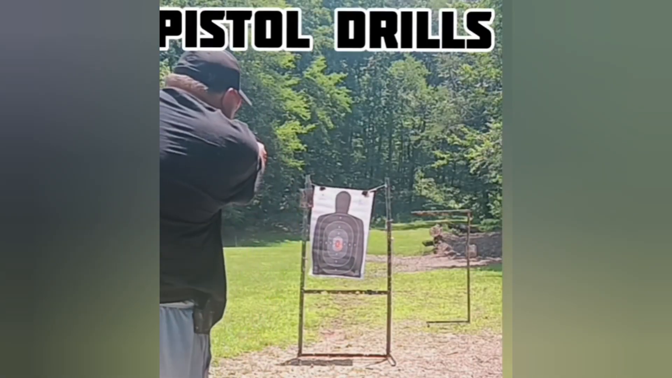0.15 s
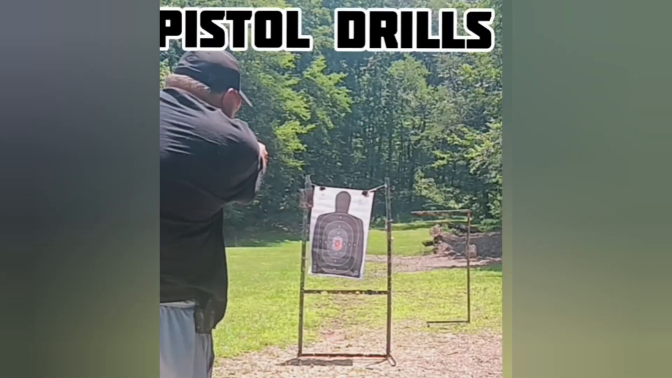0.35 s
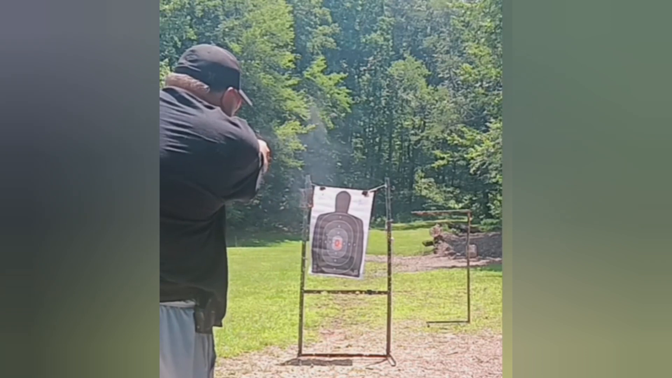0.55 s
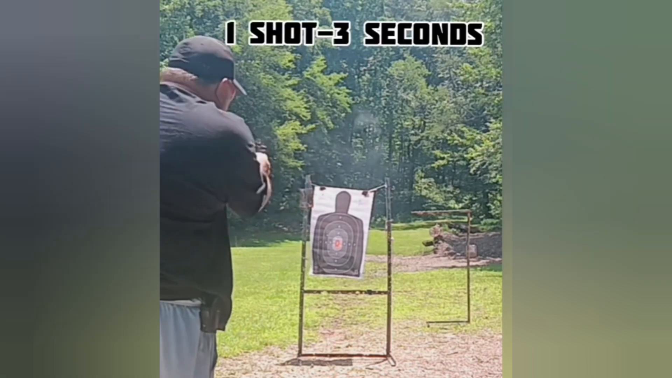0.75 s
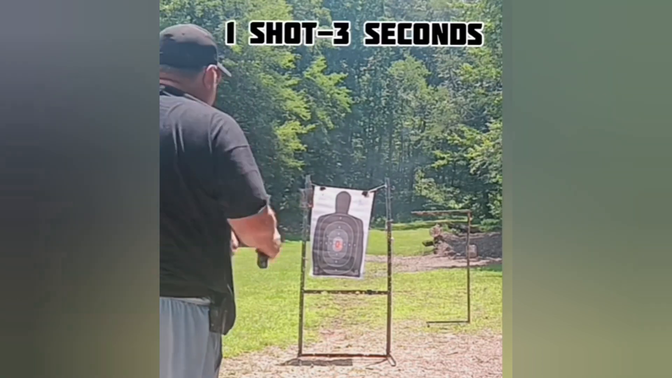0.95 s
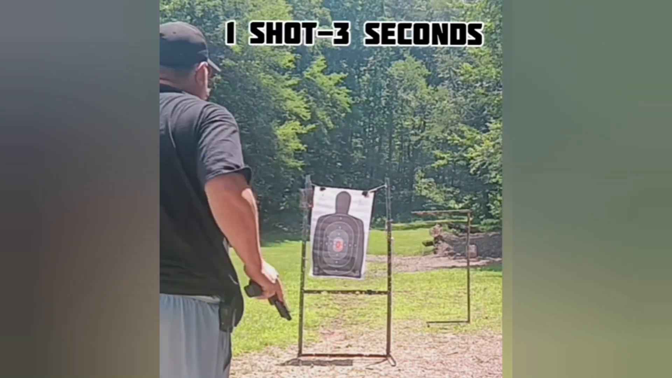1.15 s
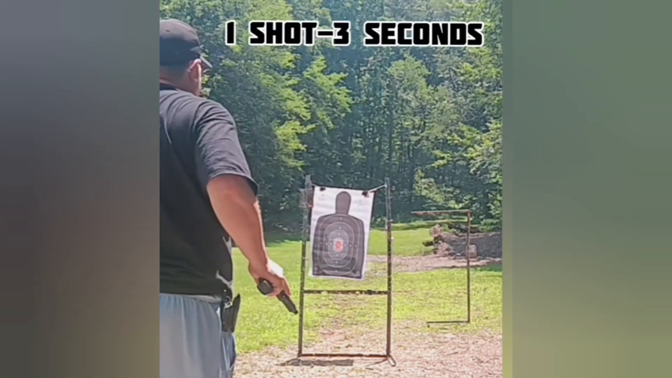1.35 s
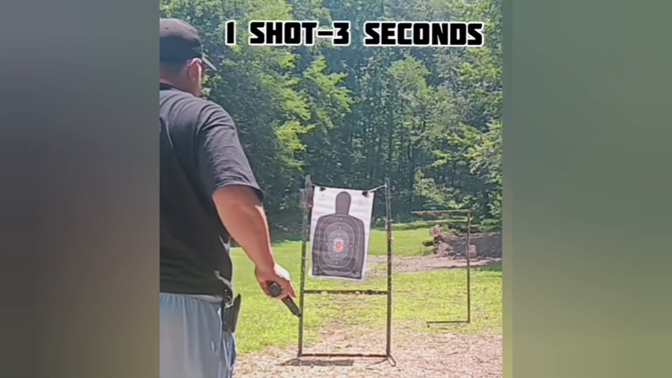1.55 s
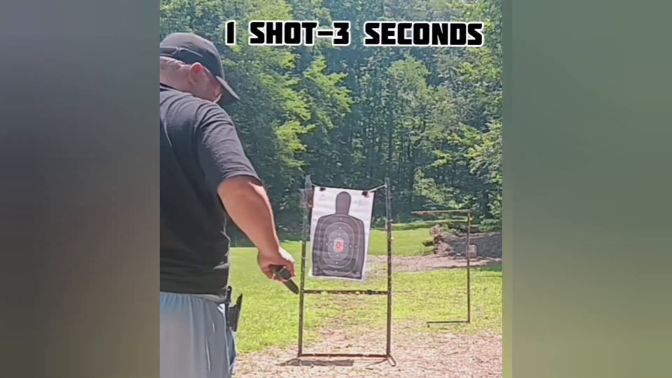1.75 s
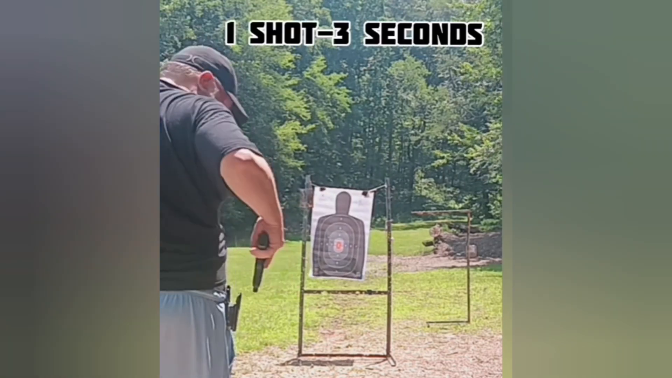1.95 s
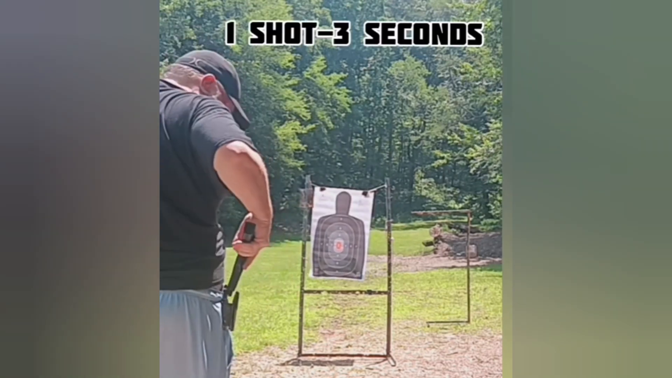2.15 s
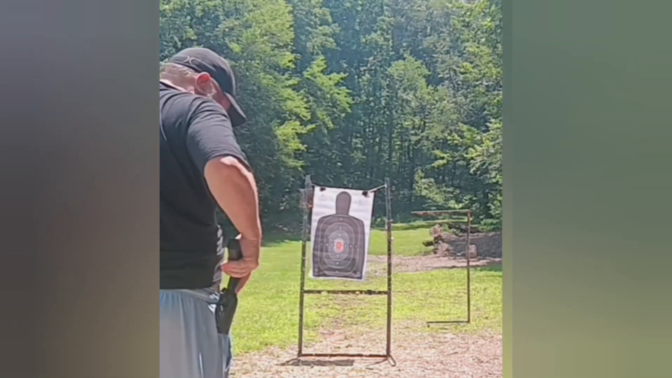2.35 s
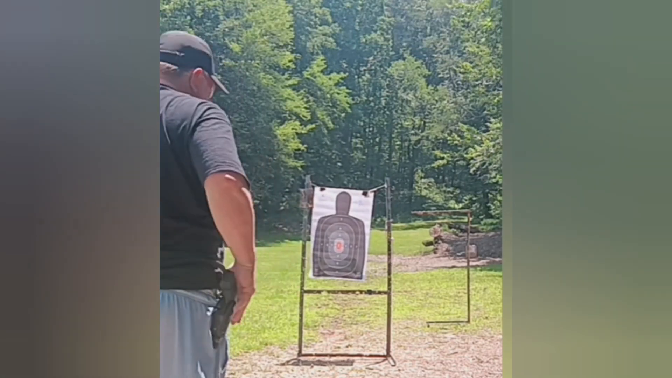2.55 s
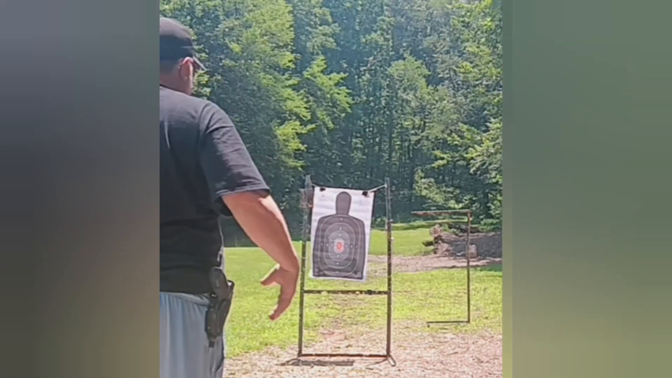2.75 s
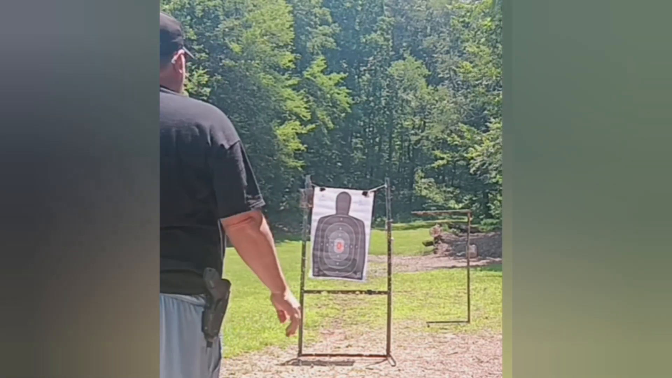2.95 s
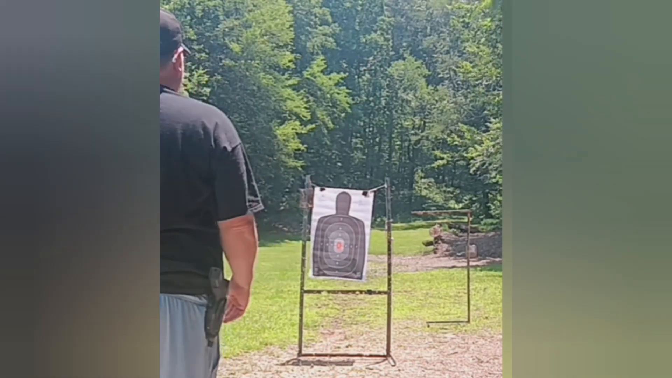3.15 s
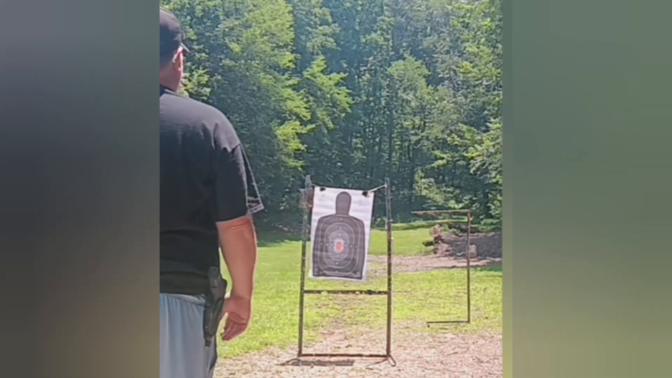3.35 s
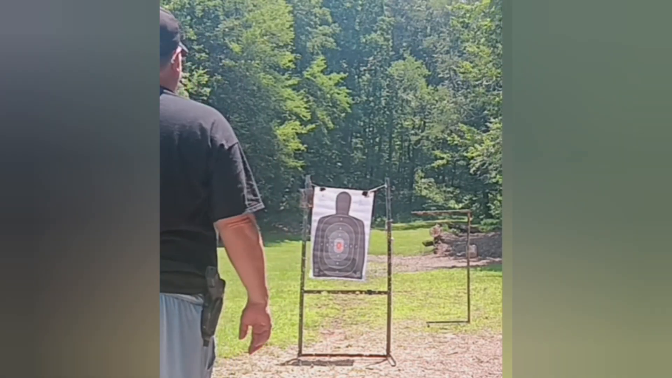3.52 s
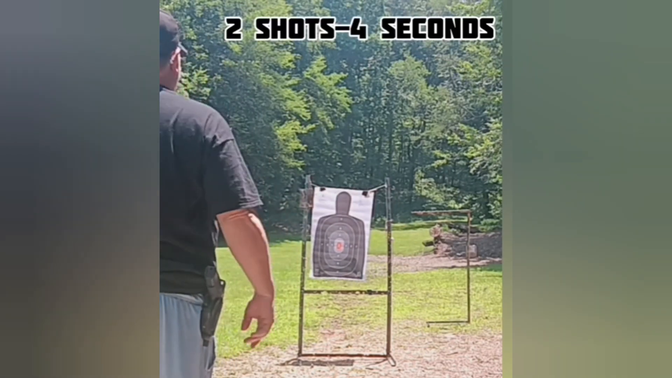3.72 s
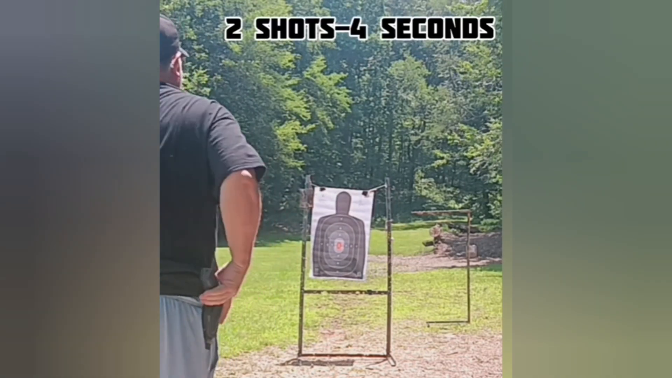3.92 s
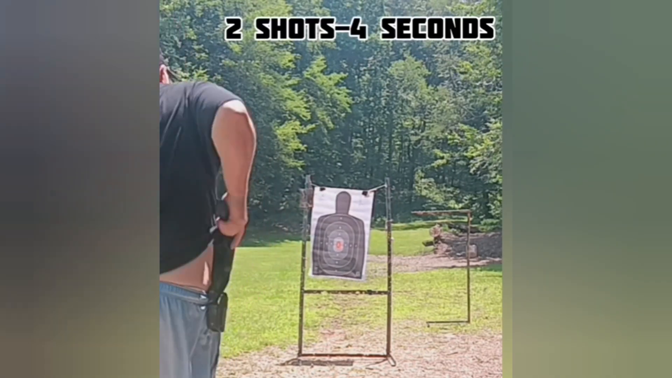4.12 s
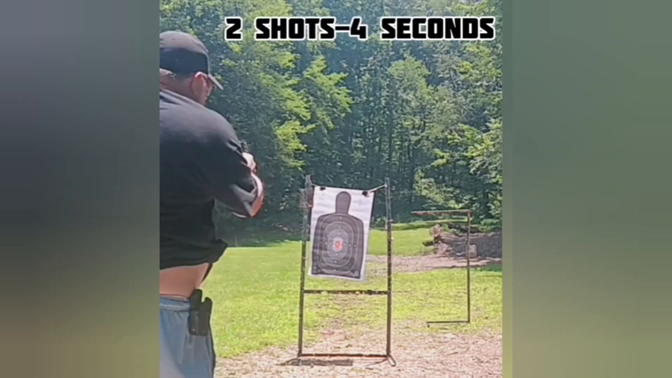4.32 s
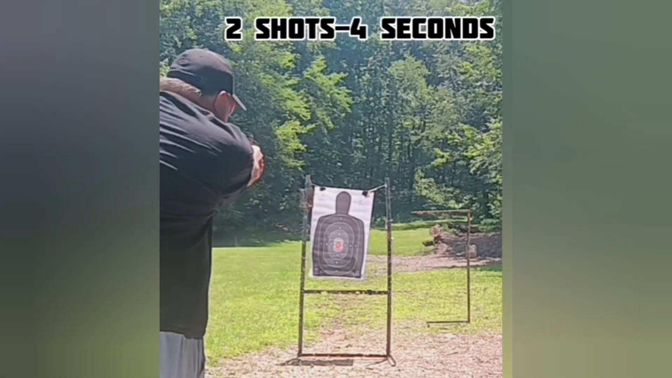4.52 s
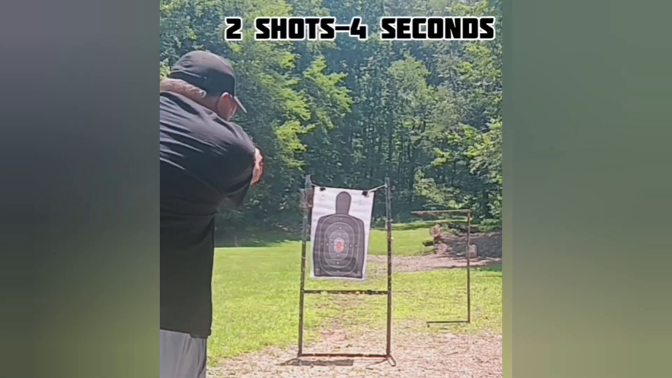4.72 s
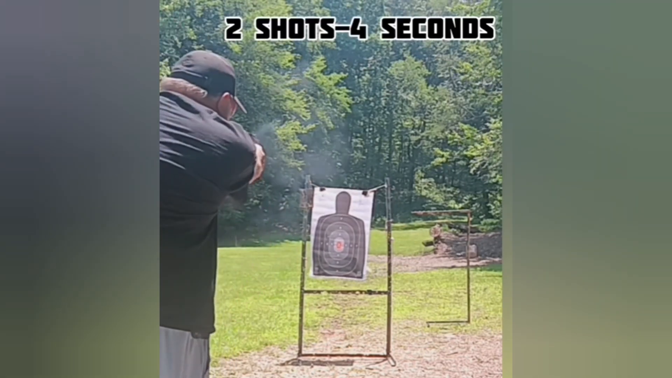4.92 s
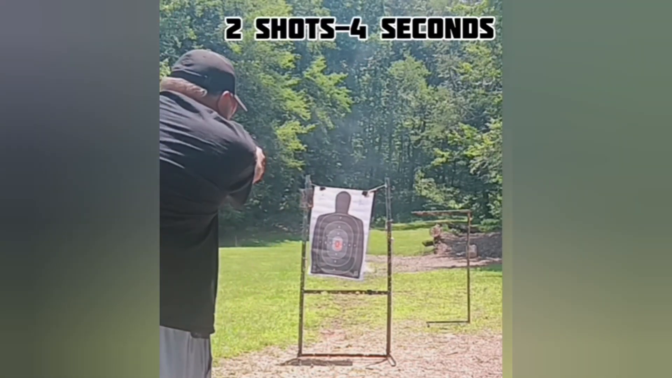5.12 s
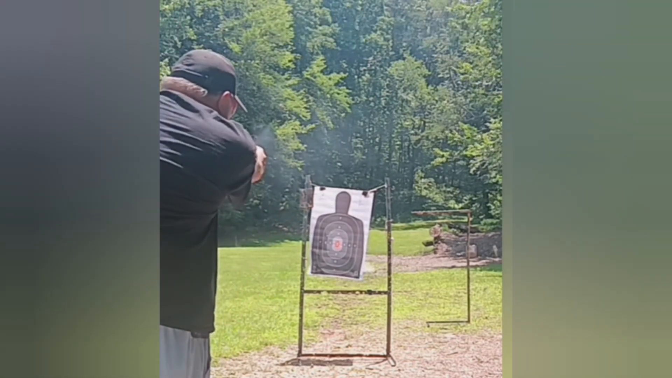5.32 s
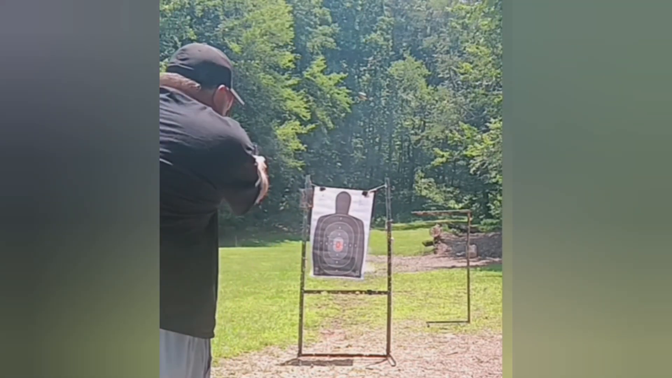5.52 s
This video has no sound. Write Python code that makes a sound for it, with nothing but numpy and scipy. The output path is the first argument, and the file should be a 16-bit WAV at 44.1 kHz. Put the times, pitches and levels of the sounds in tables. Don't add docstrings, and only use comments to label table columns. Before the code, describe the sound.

Outdoor grass range ringed by trees, heard on a phone a couple of metres from the shooter. One harsh clipped pistol blast with a dense rolling echo, a tiny high brass ring, metallic clicks and hard plastic scraping, near quiet with wind bumps on one side, a quick holster draw, then two loud shots whose echoes overlap and continue to the end.

```python
import sys
import numpy as np
from scipy import signal
from scipy.fft import rfft, irfft, next_fast_len
from scipy.io import wavfile
from scipy.ndimage import uniform_filter1d

SR = 44100
rng = np.random.default_rng(int(sys.argv[2]) if len(sys.argv) > 2 else 0)


def wav_record(signal):
    frames = np.transpose(np.atleast_2d(signal))
    bounded = np.clip(frames, -1, 1)
    quanta = np.round(bounded * 32767).astype(np.int16)
    wavfile.write(sys.argv[1], SR, quanta)


def ratio_of_db(decibels):
    return 10 ** (np.asarray(decibels, float) / 20)


N = 250047
T = np.arange(N) / SR
SIZE = next_fast_len(N + 4096)
HZ = np.maximum(np.arange(SIZE // 2 + 1) * SR / SIZE, 1)


def on_log(table, hz):
    f, v = np.transpose(table)
    return np.interp(np.log(hz), np.log(f), v)


def shape(x, gain):
    return irfft(rfft(x, SIZE) * gain, SIZE)[..., :N]


def unit(x):
    return x / np.sqrt(np.mean(x ** 2))


def peak(hz, width_hz):
    return 1 / (1 + 1j * (HZ ** 2 - hz ** 2) / (HZ * width_hz))


def causal(db):
    log = db * np.log(10) / 20
    mirrored = np.concatenate([log, log[..., -2:0:-1]], axis=-1)
    return np.exp(np.conj(signal.hilbert(mirrored))[..., :len(HZ)])


def walk(rate):
    k = int(SR / rate)
    held = np.repeat(rng.standard_normal(N // k + 1), k)
    return 1.2 * uniform_filter1d(held, k)[:N]


def grains(rough_db):
    sizes = np.minimum(rng.exponential(size=N), 5)
    return unit(rng.standard_normal(N) * ratio_of_db(rough_db * sizes))


def fall(s, t60):
    return np.exp(-np.log(1000) * np.clip(T - s, 0, 1) / max(t60, .004)) * (T >= s)


def wavelet(s, hz, db, cycles):
    return ratio_of_db(db) * np.cos(2 * np.pi * hz * (T - s)) * np.exp(-((T - s) * hz / cycles) ** 2)


LAG_S = 0.00102
# frequency in Hz, share common to both ports.
COHERENCE = [(60, 0.91), (250, 0.43), (700, 0.22), (3000, 0.068), (8000, 0.33)]


def ports(make):
    alike = np.clip(on_log(COHERENCE, HZ), 0, 1)
    common = rfft(make(), SIZE) * np.sqrt(alike)
    own = rfft([make(), make()], SIZE) * np.sqrt(1 - alike)
    return own + [common * np.exp(-2j * np.pi * HZ * LAG_S), common]


# time in seconds, level in dB.
BREEZE = [(0, -57.5), (1.0, -51.5), (2.2, -53.5), (2.85, -58.5), (2.95, -64), (3.4, -63), (4.1, -60),
          (4.7, -66.5), (4.8, -52.5)]
# middle in seconds, length in seconds, level in dB, left minus right in dB.
GUSTS = [(0, 0.0034, -35, -29.5), (0.107, 0.012, -37.5, -29.5), (0.189, 0.028, -39, -19.5),
         (0.275, 0.056, -47, -8.5), (1.06, .06, -52, 15), (1.137, 0.046, -37.5, -8), (1.25, 0.16, -48, -12),
         (1.44, 0.089, -48.5, 22), (1.577, 0.049, -34, -26), (2.198, 0.13, -55, -22),
         (2.413, 0.09, -51, 16.5), (2.675, 0.067, -53, -0.5), (2.82, 0.034, -52, -16.5),
         (3.091, .06, -55, -14), (3.324, 0.029, -48.5, -17.5), (3.465, 0.074, -39.5, -23),
         (3.629, 0.032, -40.5, -17.5), (3.704, 0.051, -45.5, -11), (3.825, 0.052, -49, 12.5),
         (4.024, 0.099, -58, -14), (4.073, 0.02, -47.5, -24), (4.167, 0.041, -44, -13),
         (4.217, 0.028, -35.5, -0.5), (4.299, 0.091, -45.5, 0.5), (4.457, 0.02, -52.5, 20.5),
         (4.599, 0.11, -58, 2)]
GUST_EDGE_DB_S = 423
# time in seconds, frequency in Hz, level in dB, width in cycles.
POPS = [(1.6, 73, -24.5, 1.2), (2.484, 69.1, -40.5, 0.75), (3.442, 60.8, -27, 1.1),
        (3.485, 81.2, -33, 2.04), (3.641, 59.6, -30, 0.62), (3.7002, 230, -17, 0.57),
        (3.7012, 640, -42.5, 0.99), (3.7064, 107, -10, 0.27), (3.727, 42.6, -22.5, 0.466),
        (4.183, 80.8, -27, 0.41), (4.2088, 110, -27, 0.65), (4.211, 201, -36, 0.59)]


def wind():
    out = []
    for side in (1, -1):
        power = ratio_of_db(2 * np.interp(T, *np.transpose(BREEZE)))
        for s, length, db, pan_db in GUSTS:
            port_db = db + side * np.clip(pan_db, -30, 30) / 2 - 3 * np.log2(np.cosh(pan_db / 17))
            outside = np.maximum(np.abs(T - s) - length / 2, 0)
            power = power + ratio_of_db(2 * (port_db - GUST_EDGE_DB_S * outside))
        eddies = unit(shape(rng.standard_normal(N), peak(46, 81)))
        puffs = np.sqrt(power) * ratio_of_db(1.7 * walk(20) - 0.5) * eddies
        out.append(shape(puffs, 1 / (1 + (HZ / 125) ** 3.1)))
    pops = sum(wavelet(*pop) for pop in POPS)
    return np.array(out) + [[.06], [1]] * pops


# frequency in Hz, level in dB per Hz.
AIR = [(90, -23), (150, 1), (400, -1), (800, -9.5), (1700, -15), (2800, -12.5), (5000, -14.5), (8000, -27),
       (10000, -26.5), (13000, -27.5), (16000, -27.5)]
AIR_DB = -76


def air():
    hush = irfft(ports(lambda: rng.standard_normal(N)) * ratio_of_db(on_log(AIR, HZ)), SIZE)[:, :N]
    return unit(hush) * ratio_of_db(AIR_DB + 5.5 + 1.1 * walk(8))


# start in seconds, length in seconds, start and end frequency in Hz, level in dB.
BIRDS = [(0, .03, 4450, 4450, -70), (0.054, .04, 4550, 4600, -65), (0.093, 0.064, 4550, 4470, -64),
         (.125, .045, 4300, 4250, -74), (0.033, .03, 2800, 2730, -79), (0.068, 0.081, 2900, 3300, -75),
         (0.08, .04, 3300, 3200, -76), (0.128, .07, 3750, 3680, -72), (0.148, .04, 3300, 3400, -81),
         (1.89, .13, 4400, 4450, -70), (.2, .07, 3650, 3730, -74), (.23, .06, 4500, 4550, -80),
         (1.993, 0.25, 2970, 3400, -70), (4.36, 0.1, 2950, 2960, -78.5), (4.404, 0.028, 2690, 2590, -80),
         (4.526, 0.033, 3250, 3190, -78.5), (4.529, 0.061, 2800, 2630, -71.5),
         (4.566, 0.034, 2520, 2410, -72), (4.583, .056, 2900, 2920, -76.5), (4.596, 0.055, 2300, 2230, -80)]


def birds():
    out, leaves = np.zeros(N), ratio_of_db(2.2 * walk(90))
    for s, length, start_hz, end_hz, db in BIRDS:
        u = np.clip((T - s) / length, 0, 1)
        hz = start_hz + (end_hz - start_hz) * u + 45 * walk(230)
        out += ratio_of_db(db) * np.sin(np.pi * u) * np.sin(2 * np.pi * np.cumsum(hz) / SR)
    return ratio_of_db(8.0) * out * leaves


# start in seconds, blast peak in dB, echo level in dB, boom in dB.
SHOTS = [
    (0.3416, -10, -0.5, 1),
    (4.7386, 0.5, -1.02, 2),
    (5.1671, -3, -0.84, 5),
]
# delay in seconds, frequency in Hz, level in dB, width in cycles.
BERM = (.314, 125, -20.5, 1.2)


def muzzle():
    out = np.zeros((2, N))
    for s, db, *_ in SHOTS:
        for late, loss_db in [(0, -0.5), (.0035, -5.5)]:
            x = (T - s - late - np.array([[LAG_S], [0]])) / 0.0019
            front = ratio_of_db(db + loss_db) * (1 - x) * np.exp(-np.abs(x)) * (x >= 0)
            out += shape(front, 1 / (1 - 130j / HZ))
        ahead = np.minimum(T - s, 0)
        out += ratio_of_db(db - 10.5) * np.exp(ahead / 0.0022) * (ahead < 0) * rng.standard_normal((2, N))
        out += wavelet(s + BERM[0], *BERM[1:])
    return out


def weights(hz):
    presence = np.interp(np.log2(hz), np.log2([700, 2200, 5300]), [0, 1, 0])
    high = max(np.log2(hz / 2200) / np.log2(5300 / 2200), 0) ** 1.05
    low = np.clip(np.log2(500 / hz) / 1.9, 0, 1)
    return presence, high, low


NEAR_DB, NEAR_PRESENCE_DB, NEAR_TREBLE_DB, NEAR_BASS_DB = -11.5, -1, -2.5, -9
HOLD_S, TREBLE_HOLD_S, BASS_HOLD_S = 0.049, .028, 0.098
FALL_DB_S, TREBLE_FALL_DB_S, BASS_FALL_DB_S, TOP_FALL_DB_S = 67, 86, 258, 38
BASS_START_DB, BASS_RISE_S = -14.5, 0.026
NEAR_END_S, NEAR_END_TIME_S, NEAR_END_DB = 0.076, 0.046, -3.5


def near_echo_db(age, hz, boom_db):
    presence, high, low = weights(hz)
    tilt = np.array([1 - min(high, 1) - low, min(high, 1), low])
    hold = tilt @ [HOLD_S, TREBLE_HOLD_S, BASS_HOLD_S]
    rate = tilt @ [FALL_DB_S, TREBLE_FALL_DB_S, BASS_FALL_DB_S] + TOP_FALL_DB_S * (hz > 15000)
    bass_db = NEAR_BASS_DB + boom_db * np.clip(np.log2(320 / hz), 0, 1)
    bass_db = bass_db + BASS_START_DB * np.clip(1 - age / BASS_RISE_S, 0, 1)
    end_db = NEAR_END_DB * np.clip((age - NEAR_END_S) / NEAR_END_TIME_S, 0, 1)
    colour_db = presence * NEAR_PRESENCE_DB + high * NEAR_TREBLE_DB + low * bass_db
    return NEAR_DB + end_db + colour_db - rate * np.maximum(age - hold, 0)


# time after the shot in seconds, level in dB.
ROLL = [(0, -36), (.3, -19), (.42, -18.5), (.7, -19.5), (.92, -20.5), (1.33, -28.5), (1.8, -36.5),
        (2.1, -40), (2.4, -49.5)]
TREE_LINE_S, TREE_RISE_S, BEFORE_TREES_DB, TREBLE_BEFORE_TREES_DB = 0.21, 0.018, 1, -3.5
FAR_PRESENCE_DB, FAR_TREBLE_DB, FAR_BASS_DB, FAR_TOP_DB = -6, -1.32, -13.5, -3
PRESENCE_LOSS_DB_S, TREBLE_LOSS_DB_S, BASS_LOSS_DB_S, DEEP_LOSS_DB_S = 7, 21, 5.5, 4.5
TREBLE_BEND_DB_S2, BASS_BEND_DB_S2 = 4.5, 1.5
TREBLE_KNEE_S, TREBLE_KNEE_TIME_S, TREBLE_KNEE_DB = .98, .2, -8
SHUT_S, SHUT_TIME_S, SHUT_DB, SHUT_EARLIER_S = 2.34, 0.37, -42, 0.16


def far_echo_db(age, hz):
    presence, high, low = weights(hz)
    early = np.clip(1 - (age - TREE_LINE_S) / TREE_RISE_S, 0, 1)
    db = np.interp(age, *np.transpose(ROLL)) + FAR_TOP_DB * (hz > 15000)
    db = db + ((1 - low) * BEFORE_TREES_DB + high * TREBLE_BEFORE_TREES_DB) * early
    db = db + presence * (FAR_PRESENCE_DB - PRESENCE_LOSS_DB_S * age)
    db = db + high * (FAR_TREBLE_DB - TREBLE_LOSS_DB_S * age - TREBLE_BEND_DB_S2 * age ** 2)
    knee = np.clip((age - TREBLE_KNEE_S) / TREBLE_KNEE_TIME_S, 0, 1)
    db = db + max(high - .7, 0) * TREBLE_KNEE_DB * knee
    db = db + low * (FAR_BASS_DB - BASS_LOSS_DB_S * age - BASS_BEND_DB_S2 * age ** 2)
    db = db - DEEP_LOSS_DB_S * age * np.clip(np.log2(210 / hz) / .7, 0, 1)
    shut = np.clip((age - SHUT_S + SHUT_EARLIER_S * (presence + high)) / SHUT_TIME_S, 0, 1)
    return db + SHUT_DB * shut


MURMUR_DB, MURMUR_DB_S = -66, 8.5
MURMUR_BASS_DB, MURMUR_PRESENCE_DB, MURMUR_TREBLE_DB = -5, -17.5, -28


def murmur_db(age, hz):
    presence, high, low = weights(hz)
    colour_db = low * MURMUR_BASS_DB + presence * MURMUR_PRESENCE_DB + high * MURMUR_TREBLE_DB
    return MURMUR_DB - MURMUR_DB_S * np.maximum(age - SHUT_S, 0) + colour_db


SAME_WOODS = 0.6


def repeat(x, again):
    return np.sqrt(SAME_WOODS) * x[:, again] + np.sqrt(1 - SAME_WOODS) * x[:, ::-1]


# frequency in Hz, level in dB per Hz.
BLAST = [(30, -1), (70, -5.5), (130, 2.5), (250, 2), (450, 3.5), (750, 3), (1200, 0.5), (2200, -1),
         (3300, -1), (5300, 0), (8000, -3), (11000, -1), (16000, -2)]
# time after the shot in seconds, level in dB, extra treble in dB.
STANDS = [(0.104, 2, 5), (.162, 1, -3), (.272, -2, 5), (.311, -2, 3.5), (0.359, 1, 2), (.447, 5.5, -5),
          (.511, 3.5, -2), (.562, 3, -5), (0.624, -5, 11), (0.653, 0, 4), (.744, 9.5, -10),
          (.975, 5.5, -11), (1.134, 3, -2), (1.223, 0.5, -1), (1.292, 3.5, 2), (1.449, 2, -1.5),
          (1.576, -1, -0.5)]
STAND_WIDTH_S, SUB_DB = 0.002, -10


def woods():
    starts, _, echo_db, boom_db = np.transpose(SHOTS)
    last = np.maximum(np.searchsorted(starts, T) - 1, 0)
    age = np.maximum(T - starts[last], 0)
    again = (age * SR).astype(int)
    echoes, out = ports(lambda: grains(2.94)) * ratio_of_db(on_log(BLAST, HZ)), 0
    clumps_db = 0.59 * walk(70)[again] * np.clip(age / 0.13, 0, 1)
    answers = np.array([np.exp(-((age - late) / STAND_WIDTH_S) ** 2) for late, *_ in STANDS])
    stands_db, stands_treble_db = np.array(STANDS)[:, 1:].T @ answers
    for step in range(19):
        hz = 31.25 * 2 ** (step / 2)
        band = np.clip(1 - np.abs(2 * np.log2(HZ / hz)), 0, 1)
        presence, high, low = weights(hz)
        deep_db = -22 * np.clip(np.log2(110 / hz), 0, 1) * np.clip((age - .052) / 0.04, 0, 1)
        db = deep_db + SUB_DB * np.clip(np.log2(55 / hz), 0, 1) + echo_db[last]
        db = db - 5.72 * presence - 6 * high + 6.7 * low
        db = db + 0.62 * walk(30)[again] + clumps_db
        db = db + (1 - low) * stands_db + min(high, 1) * stands_treble_db
        power = ratio_of_db(2 * near_echo_db(age, hz, boom_db[last]))
        power = power + ratio_of_db(2 * far_echo_db(age, hz)) + ratio_of_db(2 * murmur_db(age, hz))
        band_echo = repeat(irfft(echoes * band, SIZE)[:, :N], again)
        out = out + ratio_of_db(db) * np.sqrt(power) * band_echo
    return ratio_of_db(16.5) * out * (T >= starts[0])


# time in seconds, ring in dB, upper modes in dB, rattle in dB, rattle decay in seconds.
CASE_HITS = [(1.022, -79.5, -3, -41, 0.22), (1.043, -51, -3, -42, .02), (1.05, -34.5, 2, -40, 0.02),
             (1.092, -44.5, -14, -60, .02), (1.19, -61, -14, -52, .015), (1.228, -76, -3, -52, 0.27),
             (1.247, -73, -3, -43, 0.05), (1.27, -76, -2, -51.5, 0.32), (1.3175, -64, -6, -41, 0.018),
             (1.335, -78, -3, -52, 0.19)]
# frequency in Hz, level in dB, t60 in seconds.
CASE_MODES = [(10100, 0, .26), (10160, -4, .2), (10245, -7, .09), (10850, -10, .05), (12700, -12, .16),
              (14200, -14, .1), (11900, -18, .09)]


def case():
    out = np.zeros(N)
    for s, ring_db, upper_db, rattle_db, decay in CASE_HITS:
        for f, mode_db, t60 in CASE_MODES:
            phase = 2 * np.pi * f * T + 1.4 * walk(120)
            level_db = ring_db + mode_db + upper_db * (f > 10500) + 1.8 * walk(70.4)
            out += ratio_of_db(level_db) * np.sin(phase) * fall(s, t60)
        out += ratio_of_db(rattle_db) * rng.standard_normal(N) * fall(s, decay)
    return shape(out, peak(11500, 8000))


# time in seconds, level in dB, frequency in Hz, decay in seconds, width as share of frequency.
SNAPS = [(1.025, -42, 14800, .16, .25), (2.2175, -17, 1400, 0.03, 0.78), (2.243, -48, 9800, .02, .3),
         (2.278, -19.5, 2000, 0.027, 0.66), (2.289, -19.5, 2100, .02, .6), (2.307, -14, 2200, 0.022, 0.65),
         (2.315, -29, 3300, .03, 0.73), (2.3642, -18.5, 10100, 0.044, 0.3), (2.387, -41, 10300, .14, .1),
         (2.412, -60, 11120, 0.34, .15), (3.745, -68, 9500, 0.27, .15), (3.755, -54.5, 6260, 0.29, 0.27),
         (3.8, -62, 11000, 0.23, .15), (3.82, -49.5, 1883, 0.12, 0.34), (4.2168, -18.5, 11300, .012, .5),
         (4.2203, -28, 10200, .01, .3), (3.9405, -31, 1000, .05, .9), (4.217, -44, 1000, 0.028, 1.2),
         (4.2165, -44.5, 3400, 0.15, 0.93), (4.2248, -37.5, 10100, 0.072, 0.21),
         (4.217, -50.5, 3300, 0.019, 0.27), (4.234, -50.5, 3380, .02, .4), (4.292, -59, 3300, .22, 1.2),
         (4.224, -49, 3300, 0.11, .4), (4.242, -45, 10000, 0.024, .3), (4.26, -52.5, 10250, 0.22, .15),
         (5.5, -61, 10000, .42, .4)]


def snaps():
    out = np.zeros((2, N))
    for s, db, f, decay, width in SNAPS:
        burst = ratio_of_db(db) * fall(s, decay) * rng.standard_normal(N)
        out += shape(burst, peak(f, width * f) ** 2) * [[.4], [1]]
    return out


GRIP_DB_S, JERK_DB_S, LET_GO_DB_S = 703.5, 522, 342


def stroke(start, end, drag_db, jerk_db):
    before, after = np.maximum(start - T, 0), np.maximum(T - end, 0)
    drag = ratio_of_db(drag_db - GRIP_DB_S * before - LET_GO_DB_S * after)
    away_db = np.where(T < end, JERK_DB_S * (end - T), LET_GO_DB_S * (T - end))
    return np.maximum(drag, ratio_of_db(jerk_db - away_db))


# start and end in seconds, drag in dB, last jerk in dB, extra brightness in dB.
STROKES = [
    (2.24, 2.369, -44.5, -28.5, -10.5),
    (3.956, 4.028, -44.5, -31.5, 1),
]
# time in seconds, peak in dB, extra brightness in dB.
KNOCKS = [(2.2165, -46, -4), (2.239, -43, -5), (2.2435, -42, 1), (2.2757, -42, -3), (2.2885, -39, -3),
          (2.3075, -32, -4), (2.3149, -39, -5), (2.3425, -27, 3), (2.354, -28, -3), (2.3575, -28, 1),
          (2.3641, -27, 7), (2.3737, -22.5, -1), (2.381, -32, -1), (2.398, -34.5, -3), (2.405, -36.5, -2),
          (2.418, -42, -1), (3.9345, -46.5, 0), (3.9404, -27, -3), (3.9458, -24, 5), (3.957, -38, -2.5),
          (4.0021, -35.5, 1), (4.0135, -33, 1), (4.0203, -22, 5), (4.0255, -20, 10), (4.0289, -27, 10),
          (4.036, -27.5, 2), (4.045, -26, 3), (4.056, -34.5, -1), (4.05, -32, 1), (4.088, -48, -1)]
# frequency in Hz, width in Hz, level in dB.
SHELL = [(600, 200, -6), (1300, 1300, -3), (2300, 2200, -2.5), (3780, 840, -7)]


def holster():
    body = sum(ratio_of_db(db) * peak(f, w) for f, w, db in SHELL) / (1 + (340 / HZ) ** 6)
    slips_db = 2.2 * walk(350) + 1.0 * walk(70)
    push, bright = 0, 0
    for *row, bright_db in STROKES:
        drag = ratio_of_db(slips_db - 6.0) * stroke(*row)
        push, bright = push + drag, bright + ratio_of_db(bright_db) * drag
    for s, db, bright_db in KNOCKS:
        catch = ratio_of_db(db - 17.5) * fall(s, 0.015)
        push, bright = push + catch, bright + ratio_of_db(bright_db) * catch
    rasp = ports(lambda: grains(1.3)) * peak(6200, 11000) * peak(6000, 10000)
    rasp = irfft(rasp, SIZE)[:, :N]
    rubbing = irfft(ports(lambda: grains(1.9)), SIZE)[:, :N]
    return bright * unit(rasp) + shape(push * rubbing, body * ratio_of_db(8.0))


# time in seconds, frequency in Hz, level in dB, t60 in seconds.
RINGS = [(2.356, 1240, -31.5, 0.037), (2.362, 1934, -28.5, 0.12), (2.364, 800, -29, 0.11),
         (2.367, 1250, -33.5, 0.17), (2.396, 2440, -43, 0.18), (2.364, 3000, -38, .1),
         (2.364, 3650, -42, .06), (3.97, 6800, -45, .03), (3.962, 328, -51, .16), (3.995, 388, -50, .12),
         (4.024, 422, -42, .12), (4.289, 2100, -67, 0.062), (4.292, 895, -68, .07),
         (3.978, 1430, -43, 0.057), (4.075, 2340, -59, 0.27), (4.08, 3700, -62.5, 0.23),
         (4.08, 1520, -61, 0.19), (3.9415, 1400, -36.5, 0.02), (3.941, 3500, -42.5, 0.056),
         (3.956, 1147, -37, 0.12), (3.957, 2130, -42, 0.048), (3.964, 697, -48, 0.16),
         (3.997, 1520, -40, 0.07), (4.0203, 1550, -33, 0.08), (4.023, 600, -27, 0.1),
         (4.024, 3870, -43, 0.065), (4.033, 855, -36, 0.045), (4.034, 1600, -51.5, 0.061),
         (4.04, 2370, -41, 0.14), (4.05, 600, -41, 0.09), (4.075, 600, -55, 0.047),
         (4.288, 1392, -65, 0.13), (4.288, 1770, -62, .072), (4.305, 1640, -56, 0.045),
         (4.31, 1300, -64, .11)]
# frequency in Hz, left minus right in dB.
RING_PAN = [(600, 3.5), (870, 19), (1200, -20), (1550, -20), (2000, -1), (2400, 3), (3700, -17)]


def shell_rings():
    out = np.zeros((2, N))
    for s, f, db, t60 in RINGS:
        tone = np.sin(2 * np.pi * f * (T - s) + 0.93 * walk(400))
        attack = np.clip((T - s) / 0.00047, 0, 1)
        ring = tone * fall(s, min(t60, .3)) * attack * ratio_of_db(db + 2.5 * walk(250))
        pan = ratio_of_db(on_log(RING_PAN, f) * np.array([[.5], [-.5]]))
        out += shape(ring, 1 / (1 + (0.82 * f / HZ) ** 6)) * pan
    return out


def scene():
    return wind() + air() + birds() + muzzle() + woods() + case() + snaps() + holster() + shell_rings()


# frequency in Hz, gain in dB.
LEFT_PORT = [(60, 2.5), (300, -2.5), (2400, 5.5), (4400, -2.5), (6000, -11), (6600, -12.5), (7100, -24),
             (8100, -41.5), (11000, -40), (15000, -36)]
# frequency in Hz, gain in dB.
RIGHT_PORT = [(60, 3), (300, -9), (1900, -0.5), (4400, -0.5), (7600, 4), (10000, 11.5), (12500, 2),
              (15500, -0.5)]


def phone(dry):
    colour_db = np.array([on_log(LEFT_PORT, HZ), on_log(RIGHT_PORT, HZ)])
    x = shape(dry, causal(colour_db))
    return 1.04 * x / (1 + np.abs(x) ** 4) ** (1 / 4)


def band_limit(x):
    return signal.sosfilt(signal.butter(12, 15990, fs=SR, output="sos"), x)


def record(dry):
    mix = phone(dry)
    return band_limit(mix)


dry = scene()
out = record(dry)
wav_record(out)
```